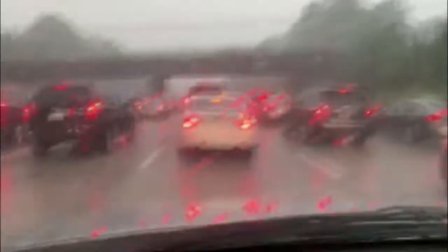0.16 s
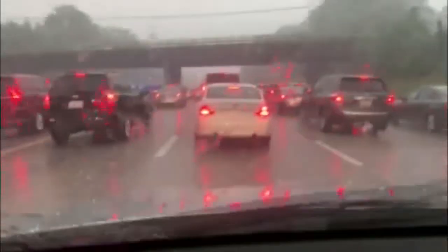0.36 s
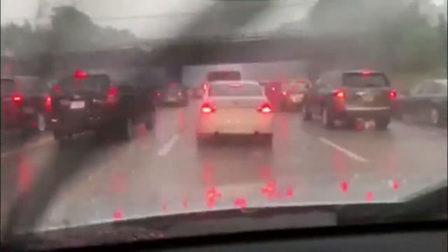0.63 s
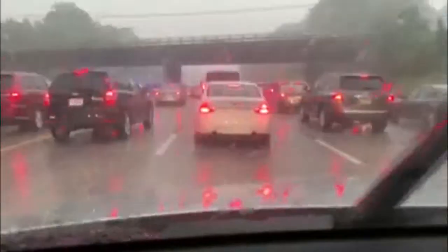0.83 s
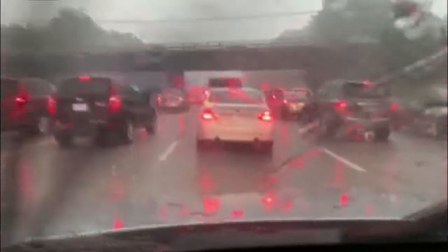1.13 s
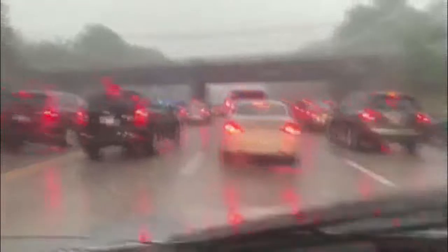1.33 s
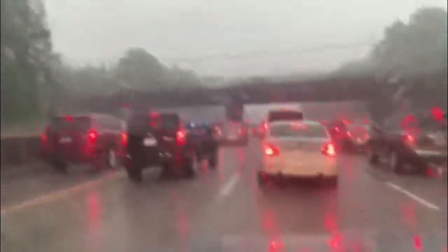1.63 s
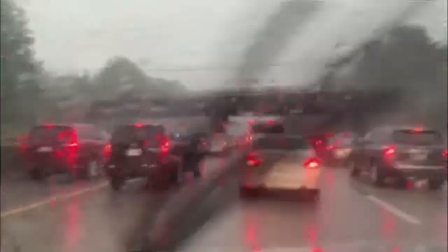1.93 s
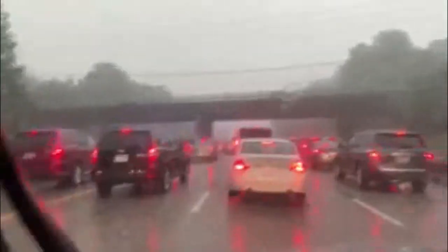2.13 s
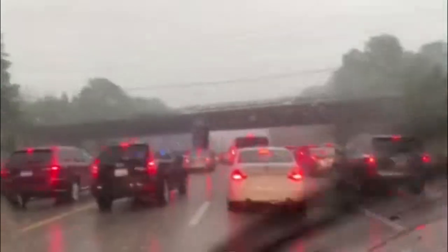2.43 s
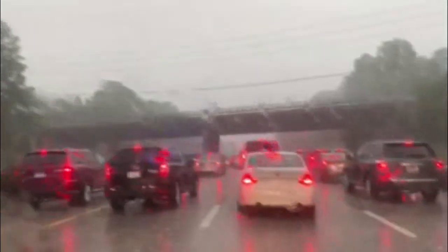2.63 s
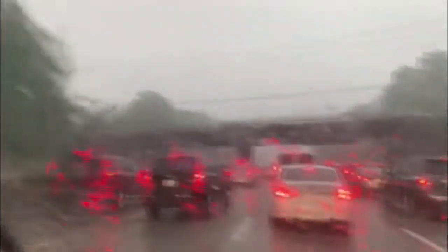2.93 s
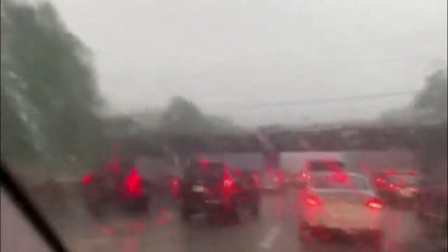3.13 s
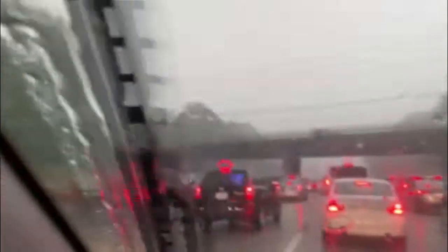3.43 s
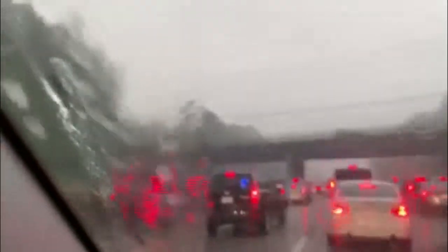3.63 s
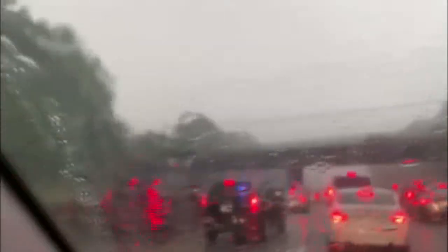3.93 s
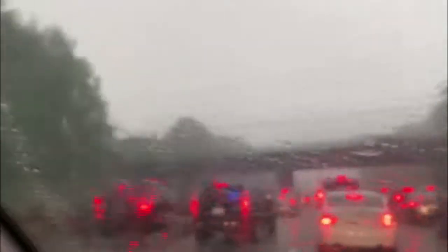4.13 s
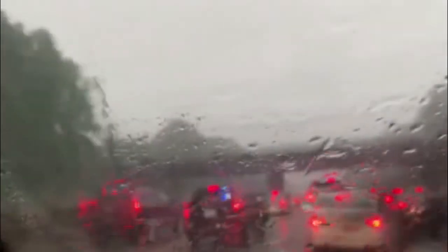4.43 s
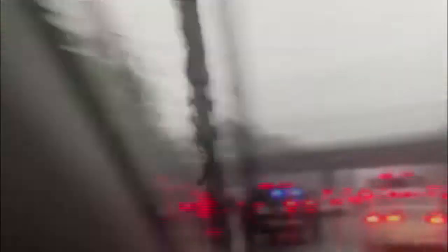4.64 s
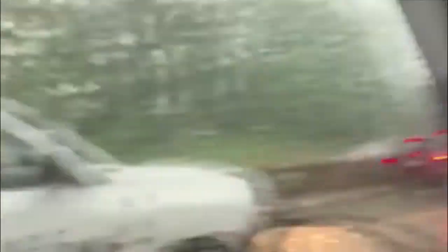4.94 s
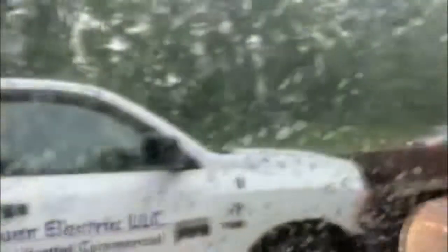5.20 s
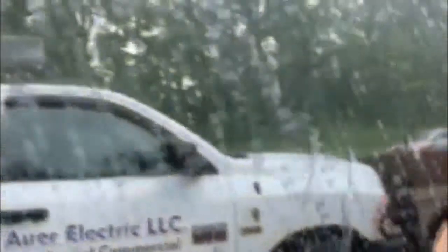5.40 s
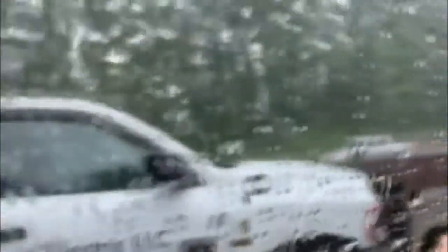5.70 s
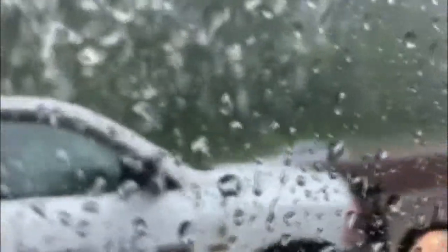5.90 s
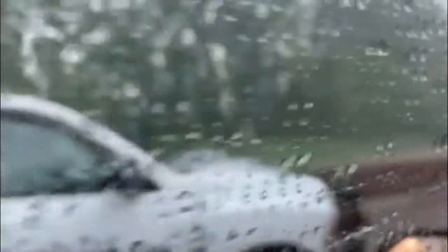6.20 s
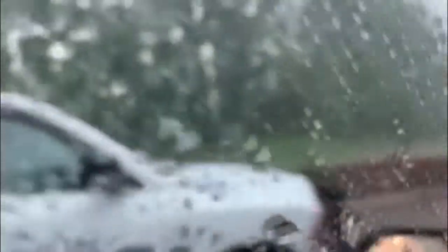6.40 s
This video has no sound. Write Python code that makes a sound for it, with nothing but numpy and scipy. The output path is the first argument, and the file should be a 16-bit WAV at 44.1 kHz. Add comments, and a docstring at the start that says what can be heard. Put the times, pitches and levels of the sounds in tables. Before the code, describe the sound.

Close stereo sound inside a car idling in stormy traffic, about 6.5 seconds. From the start a patchy rain patter, fullest in the first 0.9 seconds and then much softer, lies over a low, almost pure engine hum. Hailstones hit from 0.15 seconds: a tight flurry of bright glass cracks, metallic knocks and roof booms until about 1.1. Hits then space out, with strong snaps near 1.5 and 1.9. A dense cluster bursts around 2.3 to 2.45, followed by hard cracks at 2.7, 2.85 and 3.15. From 3.4 to 4.5 blows are frequent and heavy, with a ringing panel and deep boom near 3.6. Smaller cracks continue, then a sharp pair at 5.25. Afterwards hits thin out, with hollow thumps around 5.9 and a few last cracks at 6.1 to 6.45. Each hit is abrupt, dry and short, with brief ticking scatter.

```python
"""Hail falls on a waiting car, heard in the cabin through a pair of microphone ports.
Cracks on the glass and knocks on the sheet metal are banded noise under power envelopes, partly broken into ticks.
The roof booms and the panels ring as struck sine modes. Small stones and rain patter underneath as patchy
noise, and the idling engine hums through the body as a near sine with a wandering phase."""
import sys
import numpy as np
from scipy import signal
from scipy.fft import rfft, irfft, next_fast_len
from scipy.io import wavfile
from scipy.ndimage import uniform_filter1d

SR = 44100
rng = np.random.default_rng(int(sys.argv[2]) if len(sys.argv) > 2 else 0)


def generate_wav(sig):
    """Save sig (samples, or channels by samples) to the path in sys.argv[1] as 16-bit PCM at SR."""
    pcm = np.round(np.clip(np.atleast_2d(sig).T, -1, 1) * 32767).astype(np.int16)
    wavfile.write(sys.argv[1], SR, pcm)


N = 289296

STEP = 8   # samples per envelope point
EDGES = 35 * 2 ** np.arange(0, 9.1, 1 / 3)   # third-octave band edges, Hz
CENTRES = np.sqrt(EDGES[1:] * EDGES[:-1])   # band centres, Hz
CRACK_CREST_DB, KNOCK_CREST_DB = 8, 8   # allowance from a blow's nominal peak down to its rms level
SLOW_BELOW_DB, SLOW_SPAN_DB = -13.5, 0.5   # scatter under which a crack swells slower, span to the slowest
SCATTER_BODY_DB = 6   # per octave: the scatter is fuller than the crack below 3 kHz
RATTLE_LOSS_DB = 6   # modes lose this for every further 0.1514 s of knock ring beyond the first

# stones that crack on the glass: (time [s], nominal peak [dB], scatter re peak [dB],
# added treble slope above 3 kHz [dB per octave])
GLASS_CRACKS = [(0.151, -22.5, 2.5, -14.5), (0.233, -10.5, -2.5, -8), (0.306, -9, -3, -6),
                (0.413, -6, -43.5, -13), (0.4628, -34, -49.5, 21.5), (0.534, -2.5, -3, -4),
                (0.6106, -4, -30.5, 1), (0.623, -22, 3.5, -1.5), (0.74, -22, 0, -0.5), (0.78, -22, 5, -3.5),
                (0.852, -17.5, -1, -4), (0.9317, -16, -10.5, 0), (0.961, -22, 2.5, -3.5),
                (0.983, -17, -1.5, -6.5), (1.121, -23, -28, 15), (1.2975, -12.5, 3.5, -2),
                (1.3943, -23.5, 4.5, -7.5), (1.454, -11, 1, -1.5), (1.506, 2, -21.5, 2.5),
                (1.6714, -16.5, -10.5, 0.5), (1.744, -28.5, -3, 4), (1.9112, 1, -21.5, -0.5),
                (2.158, -16, -12.5, -7), (2.079, -31, 8, -7), (2.285, -20.5, 1, -24),
                (2.324, -3.5, -16.5, 0), (2.368, 0.5, -17, -1.5), (2.384, -10, -8.5, -0.5),
                (2.419, -16, -5, 1), (2.4286, -3, -22, -36), (2.586, -13, -3, -7),
                (2.617, -19.5, 6.5, -5.5), (2.68, -5, -13.5, -0.5), (2.8525, -1, -22, -3),
                (2.983, -27.5, 4, -17), (3.134, -19, 4, -6.5), (3.152, -2.5, -12, -0.5),
                (3.397, -9.5, -7, 1.5), (3.4064, -1.5, -17.5, 0.5), (3.546, -0.5, -13, -1.5),
                (3.665, -20.5, 2.5, -1), (3.731, -16.5, 6, -9.5), (3.785, -4, -8, -2.5),
                (3.858, 0, -18, -9.5), (4.128, 0, -12.5, -2.5), (4.179, -1.5, -17.5, -4.5),
                (4.345, -14.5, -10.5, -2), (4.3992, -1.5, -14, -3.5), (4.448, 2, -20.5, -3.5),
                (4.589, -11.5, -9, -5), (4.62, -15.5, 1, -7), (4.676, -10.5, -20, -4.5),
                (4.7052, -12.5, -15.5, -5), (4.7987, -11.5, -14.5, 3), (4.814, -16.5, 2.5, -15),
                (4.9276, -7, -7.5, 0), (4.964, -15, -10.5, 0), (5.072, -16.5, 0.5, -6),
                (5.201, -19.5, 0.5, -8), (5.248, 0, -16.5, 1), (5.255, 0, -13, 0),
                (5.286, -4.5, -6.5, -3.5), (5.463, -17, 2.5, -4), (5.571, -28.5, 1.5, -7.5),
                (5.718, -23, -18.5, -8.5), (5.838, -9.5, -7.5, -7), (6.0645, -8, -15, -8),
                (6.12, -7.5, -6.5, -1.5), (6.2863, -15.5, -18.5, -4), (6.451, -21.5, -12, -7.5)]
# colour of a crack on glass, before levelling: (frequency [Hz], relative density [dB per Hz])
GLASS_COLOUR = [(300, -9), (1200, -4.5), (2800, 4), (5000, 1.5), (9000, -1.5), (13000, -9), (16000, -13.5)]


def cracks(spot_db=2.0, pan_db=-1.0):
    """Ice splinters in a brief crack, then the splinters tick over the pane while the cabin rings."""
    power, scatter = silence(), silence()
    spots = rng.standard_normal((len(GLASS_CRACKS), len(CENTRES) + 1))
    # each stone reaches the two ports unevenly, band by band
    band_lean_db = 3.5 * rng.standard_normal((len(GLASS_CRACKS), len(CENTRES)))
    pans_db = pan_db * spots[:, :1] + band_lean_db
    treble = np.clip(np.log2(CENTRES / 3000), 0, 2)
    body = np.clip(np.log2(3000 / CENTRES), 0, 3)
    for (s, db, scatter_db, tilt_db), spot, lean_db in zip(GLASS_CRACKS, spots, pans_db):
        slow = np.clip((SLOW_BELOW_DB - scatter_db) / SLOW_SPAN_DB, 0, 1)
        rise_s = 0.0003 + 0.0012 * slow
        tilted = at_hz(GLASS_COLOUR, CENTRES) + treble * tilt_db
        colour = band_db(tilted, 2000, 9000) + db - CRACK_CREST_DB
        # every spot of the pane favours other modes; the scatter covers many spots and evens them out
        crack_db = colour + spot_db * spot[1:]
        add(power, s + 0.00092, crack_db, np.full(len(CENTRES), .024), rise_s, lean_db)
        ring_db = colour + scatter_db + SCATTER_BODY_DB * body + .5 * spot_db * spot[1:]
        ring_t60 = 0.179 * (CENTRES / 4000) ** -.1
        add(scatter, s + 0.000533, ring_db, ring_t60, .002, lean_db, hold=1.146)
    return power + scatter * ticks(per_s=90.0, t60=.018, share=.7)


# stones that set a panel or a pane ringing: (time [s], nominal peak [dB], centre [Hz],
# nominal time to fall 60 dB [s])
PANEL_KNOCKS = [(0.155, -16, 1390, 0.318), (0.225, -16, 472, 0.143), (0.238, -9.5, 1635, 0.297),
                (0.309, -15.5, 1420, 0.24), (0.746, -18.5, 524.5, 0.18), (0.849, -14, 1653, 0.27),
                (0.861, -13, 1058, 0.121), (0.872, -16, 652, 0.113), (0.995, -18, 2400, 0.268),
                (1.303, -21, 1106, 0.18), (1.389, -16.5, 927, 0.35), (1.455, -13, 1957, 0.291),
                (1.672, -18, 1766, 0.0247), (1.911, -13, 4144, 0.09), (1.961, -22, 387, 0.176),
                (2.157, -17.5, 526, 0.093), (2.286, -16.5, 1676, 0.074), (2.325, -14.5, 524, 0.051),
                (2.368, -7.5, 2970, 0.036), (2.433, -3.5, 473, 0.063), (2.586, -24.5, 788, 0.16),
                (2.683, -15, 500, 0.057), (2.853, -7.5, 351, 0.0287), (2.983, -22.5, 1360, 0.33),
                (3.138, -15, 1245, 0.106), (3.394, -10, 2125, 0.047), (3.579, -6, 1350, 0.437),
                (3.59, -7.5, 438, 0.162), (3.73, -8, 1768, 0.331), (3.756, -19.5, 423, 0.54),
                (3.784, -15.5, 1645, 0.333), (3.861, -19, 521, 0.175), (4.13, -11, 408, 0.195),
                (4.129, -10.5, 1595, 0.0646), (4.179, -11.5, 3155, 0.056), (4.197, -15, 1923, 0.278),
                (4.378, -5, 918, 0.0565), (4.381, -10.5, 466, 0.115), (4.801, -16, 372.2, 0.069),
                (4.825, -16, 2695, 0.267), (5.068, -12.5, 1582, 0.325), (5.288, -10.5, 657, 0.122),
                (5.466, -15.5, 1996, 0.18), (5.84, -20, 407, 0.0386), (5.895, -12.5, 431, 0.584),
                (6.12, -13.5, 3160, 0.039), (6.15, -20, 1506, 0.44)]


def knocks(above_db=8.5, spot_db=2.5):
    """Sheet metal swells with its ring time and rustles in a broad hump around the struck panel's centre."""
    power = silence()
    spots = rng.standard_normal((len(PANEL_KNOCKS), len(CENTRES) + 1))
    for (s, db, hz, t60), spot in zip(PANEL_KNOCKS, spots):
        octaves = np.log2(CENTRES / hz)
        # 7 dB per octave under the centre, above_db per octave over it
        hump = np.minimum(7 * octaves, -above_db * octaves) + spot_db * spot[1:]
        fade_s = 0.89 * max(t60, .03) * (CENTRES / 900) ** -.2
        pure_db = 4 * max(np.log2(1000 / hz), 0)   # low panels ring more than they rustle
        rustle_db = band_db(hump, hz / 1.2, hz * 1.2) + db - KNOCK_CREST_DB - pure_db
        rise_s = .022 * t60   # long rings also swell slower
        add(power, s + 0.000137, rustle_db, fade_s, rise_s, 3 + 2.6 * spot[0], hold=1.148)
    return power * ticks(per_s=50.0, t60=.04, share=.5)


# blows that make the roof boom: (time [s], level before the roof's own gain [dB], centre [Hz])
ROOF_BLOWS = [(0.251, -2, 182), (0.313, -4.5, 135), (0.419, -9.5, 100), (0.548, -16.5, 225),
              (0.874, -7.5, 174), (0.986, -12.5, 212), (1.048, -9.5, 187), (1.065, -11, 100),
              (1.304, -21.5, 152), (1.457, -11, 164), (1.576, -7.5, 109), (1.673, -9, 118),
              (2.3, -9.5, 120), (2.427, -13, 261), (2.683, -13.5, 152), (2.794, -10.5, 147),
              (2.922, -11.5, 105), (3.588, -1, 156), (3.757, -4.5, 162), (3.876, -11.5, 190),
              (4.083, -10.5, 111), (4.14, -8.5, 288), (4.415, -11, 97), (4.813, -12, 94),
              (4.935, -16.5, 146), (5.079, -10, 142), (5.432, -15.5, 120), (5.903, -9, 250),
              (5.94, -9, 133), (6.051, -11, 80), (6.149, -11.5, 195)]
# modes of roof and cabin, before each blow detunes them: (frequency [Hz])
ROOF_MODES = [77.06, 94.2, 109.47, 126.4, 144.73, 162.94, 185.87, 209.56, 253.95, 294.3, 361]
PANEL_MODES = np.geomspace(320, 5200, 44)   # modes of panels and panes before detuning, Hz


def roof():
    """Low modes boom nearly alike in both ports, panel modes ring with a wider spread of phase."""
    booms = [(s, db, hz, 0.2426 * (hz / 150) ** -.4) for s, db, hz in ROOF_BLOWS]
    knocked = []
    for s, db, hz, t60 in PANEL_KNOCKS:
        loss_db = RATTLE_LOSS_DB * max(t60 / 0.1514 - 1, 0)   # long rattles ring less purely
        knocked.append((s, db - loss_db, hz, 0.667 * max(t60, .03)))
    low = struck_modes(booms, np.array(ROOF_MODES), slope_db=26.5, level_db=-7.0, build_up=0.016, spread=0.113)
    high = struck_modes(knocked, PANEL_MODES, slope_db=45.5, level_db=-0.5, build_up=0.011, spread=0.892)
    return low + high


# the shower under the single stones: (time [s], level before patches and trim [dB])
SHOWER_LEVEL = [(0.0, -23.5), (0.89, -35), (1.09, -35), (2.92, -32.5), (3.6, -31.5), (3.87, -29.5),
                (5.4, -37), (5.7, -37.5), (6.56, -36.5)]
# colour of the rain, before levelling: (frequency [Hz], relative density [dB per Hz])
RAIN_COLOUR = [(30, -7.5), (48, -3.5), (65, -11), (97, -14), (175, -13), (734, -28.5), (1650, -29),
               (3200, -36.5), (8360, -51.5), (12200, -58.5), (13600, -65.5), (16000, -111)]


def rain(patchy_db=2.5):
    """A patchy hiss of rain, about half of it in the mid and treble as ticks of drops and small stones."""
    s, db = np.transpose(SHOWER_LEVEL)
    level_db = np.interp(np.arange(N // STEP + 1) * STEP / SR, s, db)
    # the rumble below the panels' range follows the shower only in part
    follow = np.clip(np.log2(CENTRES / 60) / 4.2, 0, 1)[:, None]
    level_db = db.mean() + follow * (level_db - db.mean())
    patches_db = patchy_db * (0.5 * drift(2.02, count=1) + drift(9.34, count=len(CENTRES)))
    colour_db = band_db(at_hz(RAIN_COLOUR, CENTRES), 400, 6000)[:, None]
    power = amp(2 * (colour_db + level_db + patches_db - 2.5))
    power = power * ticks(per_s=60.0, t60=.03, share=.55)
    return power * amp([1.5, -1.5])[:, None, None]   # leans to the left port


ENGINE_HZ, ENGINE_DB = 45.27, -24   # mean firing rate, rms level


def engine(wander=0.71):
    """The firing rate of the idling engine, a near sine whose phase wanders a little (radians)."""
    phase = wander * np.repeat(drift(1.55, count=1)[0], STEP)[:N]
    turning = 2 * np.pi * ENGINE_HZ * np.arange(N) / SR
    return np.sqrt(2) * amp(ENGINE_DB) * np.sin(turning + phase - phase[0])


# how alike the two ports hear the noise: (frequency [Hz], left-right likeness [0 to 1])
PORT_LIKENESS = [(40, 1), (125, 1), (250, 0.65), (500, 0.24), (2000, 0.0064), (4000, 0.498), (8000, 1)]


def dense_modes(power):
    """Panes and panels have too many modes to count: stereo noise in bands under the power envelopes."""
    out = 0
    white = resonant_noise(depth_db=3.6, width_hz=40.0, count=6) * np.sqrt(SR / 2)
    for k, (low, high) in enumerate(zip(EDGES, EDGES[1:])):
        band = signal.butter(2, [low, high], "band", fs=SR, output="sos")
        mid, side = signal.sosfilt(band, white[k % 2])
        alike = np.clip(at_hz(PORT_LIKENESS, CENTRES[k]), 0, 1)
        pair = np.sqrt((1 + alike) / 2) * mid + np.sqrt((1 - alike) / 2) * side * [[1], [-1]]
        envelope = np.repeat(np.sqrt(power[:, k]), STEP, axis=1)[:, :N]
        out = out + envelope * pair
    return out


def struck_modes(blows, modes, slope_db, level_db, build_up, spread):
    """Each blow (s, dB, centre Hz, t60 s) favours modes near its centre; the swing builds up, then dies."""
    out = np.zeros((2, N))
    t = np.arange(int(.4 * SR)) / SR
    luck = rng.standard_normal((len(blows), 4, len(modes)))
    for (s, db, hz, t60), (phase, side, detune, spot) in zip(blows, luck):
        octaves = np.abs(np.log2(modes / hz))
        near = octaves < .8
        strength = amp(db + level_db + 2 * spot - slope_db * octaves)[near]
        swing = (1 - np.exp(-t / (build_up * t60))) * amp(-60 * t / t60)
        tuned_hz = (modes * (1 + 0.01653 * detune))[near]
        start = int(s * SR)
        for channel, sign in enumerate((1, -1)):
            port_phase = (3 * phase + sign * spread * side)[near, None]
            angle = 2 * np.pi * np.outer(tuned_hz, t) + port_phase
            out[channel, start:start + len(t)] += (swing * (strength @ np.sin(angle)))[:N - start]
    return out * amp([[.9], [-.9]])


def resonant_noise(depth_db, width_hz, count):
    """Noise with many narrow resonances; sets of them give way to one another by chance."""
    size = next_fast_len(N)
    bins = int(width_hz * size / SR)
    ripple = rng.standard_normal((count, size // 2 + 1))
    ripple = uniform_filter1d(uniform_filter1d(ripple, bins), bins)
    # the resonances deepen from nothing at 0 Hz to full depth at 1500 Hz
    depth = np.log(amp(depth_db)) * np.clip(np.arange(size // 2 + 1) * SR / size / 1500, 0, 1)
    ripple = np.exp(depth * ripple / ripple.std() - depth ** 2)
    turn = amp(10 * drift(8, count=count))
    turn = turn / np.sqrt(np.sum(turn ** 2, axis=0))   # constant total power
    turn = np.repeat(turn, STEP, axis=1)[:, :N]
    spectra = (rfft(rng.standard_normal((2, 2, size))) * shape for shape in ripple)
    return sum(share * irfft(spectrum, size)[..., :N] for share, spectrum in zip(turn, spectra))


def ragged(together_db, own_db):
    """Splinters and drops land unevenly: a fast flutter of power, partly common to all bands."""
    together = together_db * (drift(60, count=1) + drift(250, count=1))
    return amp(2 * (together + own_db * drift(40, count=len(CENTRES))))


def ticks(per_s, t60, share):
    """Part of the power comes as decaying ticks of uneven size, each about an octave wide; mean about 1."""
    shape = (len(CENTRES), N // STEP + 1)
    fade = 10 ** (-6 * STEP / SR / t60)
    landed = (rng.random(shape) < per_s * STEP / SR) * rng.exponential(1, shape)
    widened = uniform_filter1d(uniform_filter1d(landed, size=3, axis=0), size=2, axis=0)
    train = signal.lfilter([1], [1, -fade], widened)
    # no ticks below 150 Hz, the full share from 600 Hz up
    part = np.clip(share, 0, 1) * np.clip(np.log2(CENTRES / 150) / 2, 0, 1)[:, None]
    return 1 - part + part * train / train.mean()


def add(power, s, gains_db, t60, rise_s, pan_db=0, hold=1):
    """A blow's power swells in rise_s around s and falls 60 dB in t60 per band; hold > 1 lingers, then drops."""
    start = max(int((s - 6 * rise_s) * SR / STEP), 0)
    stop = min(start + int((t60.max() + 6 * rise_s) * SR / STEP), power.shape[2])
    t = np.arange(start, stop) * STEP / SR - s
    fade = 10 ** (gains_db[:, None] / 10 - 6 * (np.maximum(t, 0) / t60[:, None]) ** hold)
    swell = 1 / (1 + np.exp(-t / rise_s)) ** 2
    # applied to power, so pan_db is the whole difference between the ports
    pan = amp(np.outer([1, -1], pan_db * np.ones(len(t60))))[:, :, None]
    power[:, :, start:start + len(t)] += swell * fade * pan


def silence():
    """Empty power envelopes: channel, band, time."""
    return np.zeros((2, len(CENTRES), N // STEP + 1))


def drift(rate, count):
    """Smoothed chance at envelope rate, one row per band, slower for a lower rate (Hz); spread 1."""
    r = np.exp(-2 * np.pi * rate * STEP / SR)
    chance = rng.standard_normal((count, N // STEP + 4001))
    slow = signal.lfilter([1], [1, -2 * r, r * r], chance)[:, 4000:]   # drop the filter's run-in
    return slow / slow.std(axis=1, keepdims=True)


def band_db(db_per_hz, lo_hz, hi_hz):
    """Band gains, scaled so that the power of the bands between lo_hz and hi_hz sums to 0 dB."""
    inside = (CENTRES > lo_hz) & (CENTRES < hi_hz)
    band_power = amp(db_per_hz) ** 2 * np.diff(EDGES)
    return db_per_hz - 10 * np.log10(np.sum(band_power[inside]))


def at_hz(points, hz):
    """Reads a (Hz, value) table on a log-frequency axis."""
    table = np.array(points)
    return np.interp(np.log(hz), np.log(table[:, 0]), table[:, 1])


def amp(db):
    """dB to amplitude gain."""
    return 10 ** (np.asarray(db) / 20)


def scene():
    """Hail and rain on the shell of the car, the engine below."""
    flutter = ragged(together_db=.6, own_db=.9)
    return dense_modes(flutter * (cracks() + knocks() + rain())) + roof() + engine()


CUTOFF_HZ = 16300   # start of the steep cut's stopband
TOP = .93   # where peaks level off
# phase by which the left port lags the right: (frequency [Hz], lag [turns])
LEFT_PORT_LAG = [(430, 0.0226), (3000, 0.74), (4000, 0.998)]


def record(dry):
    """The left port lags in the middle range, peaks are rounded, the top octave falls away and is cut."""
    size = next_fast_len(N + 4096)
    hz, turns = np.transpose(LEFT_PORT_LAG)
    lag = np.exp(-2j * np.pi * np.interp(np.arange(size // 2 + 1) * SR / size, hz, turns))
    ports = np.array([irfft(rfft(dry[0], size) * lag, size)[:N], dry[1]])
    rounded = TOP * np.tanh(ports / TOP)
    dull = signal.sosfilt(signal.butter(6, 13900, fs=SR, output="sos"), rounded)
    return signal.sosfilt(signal.cheby2(12, 70, CUTOFF_HZ, fs=SR, output="sos"), dull)


dry = scene()
out = record(dry)
generate_wav(out)
```